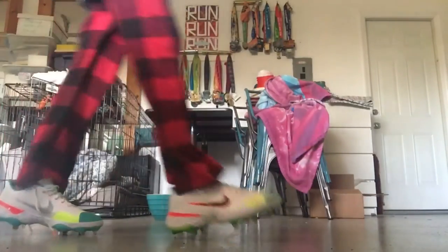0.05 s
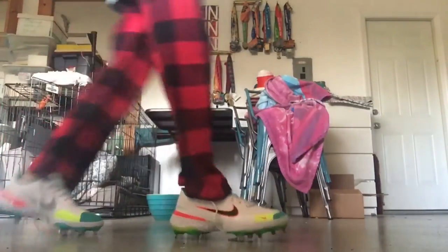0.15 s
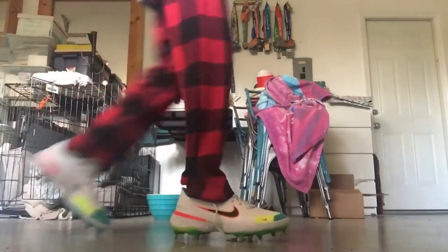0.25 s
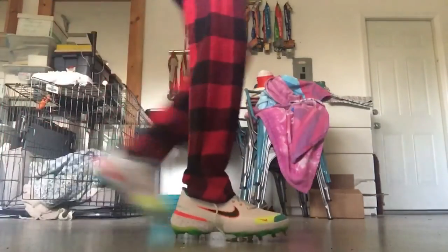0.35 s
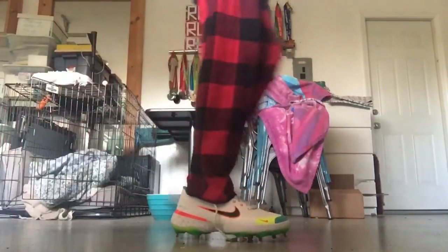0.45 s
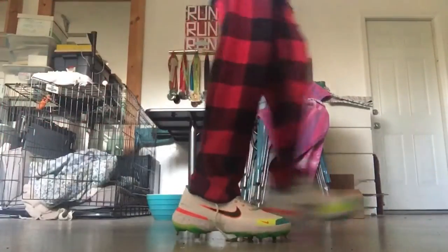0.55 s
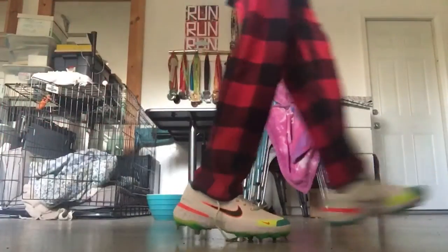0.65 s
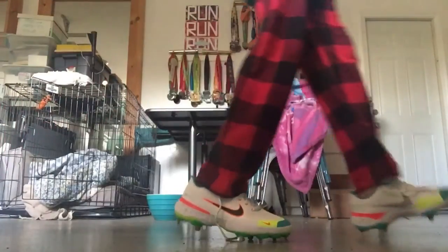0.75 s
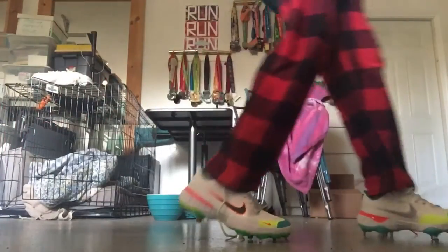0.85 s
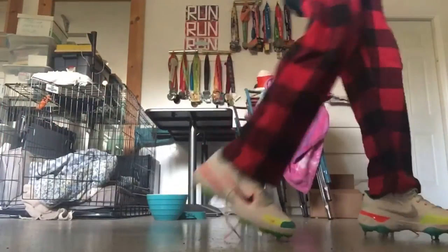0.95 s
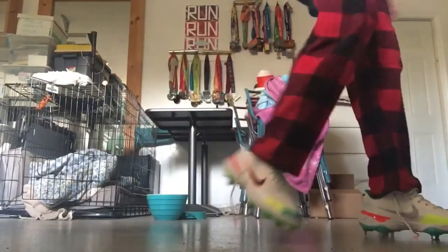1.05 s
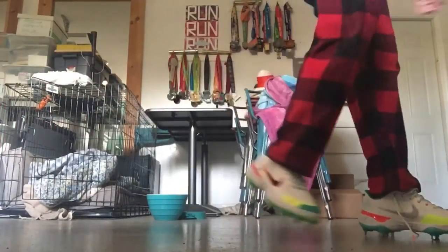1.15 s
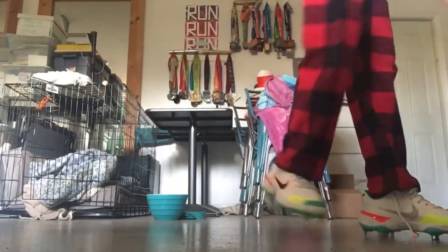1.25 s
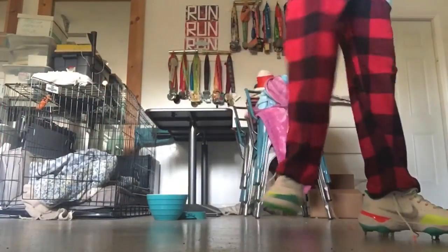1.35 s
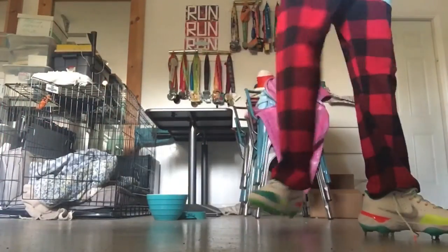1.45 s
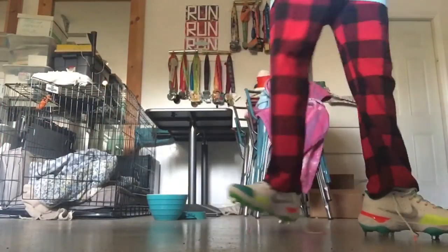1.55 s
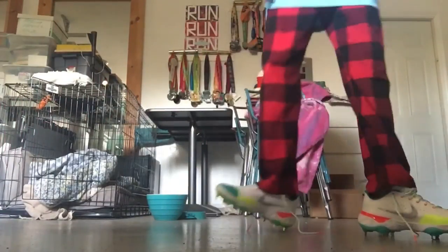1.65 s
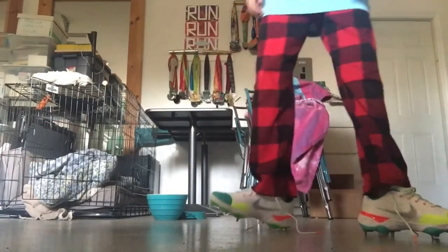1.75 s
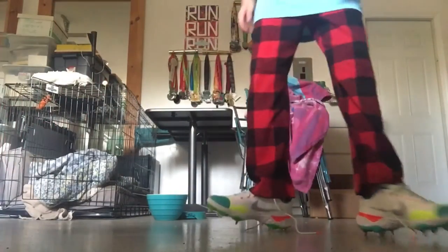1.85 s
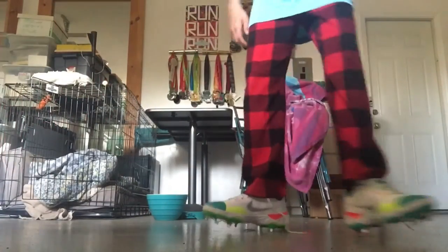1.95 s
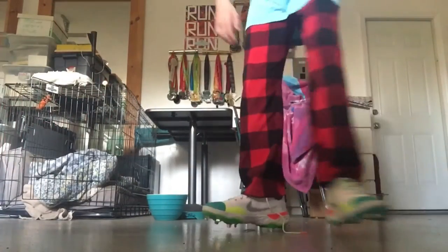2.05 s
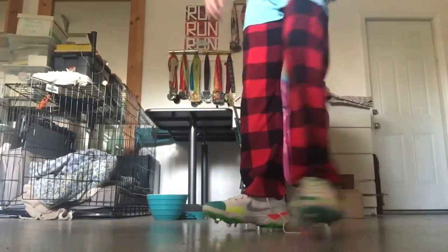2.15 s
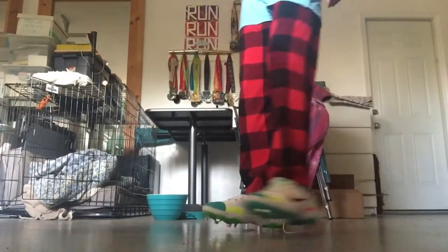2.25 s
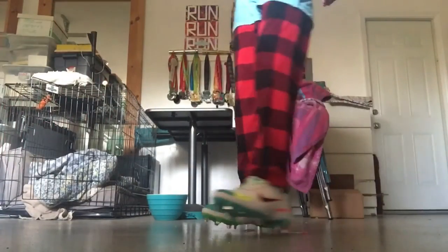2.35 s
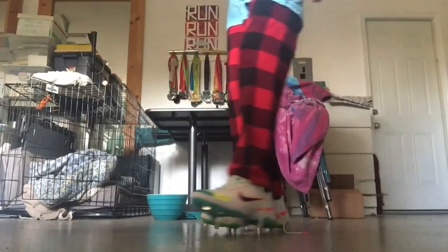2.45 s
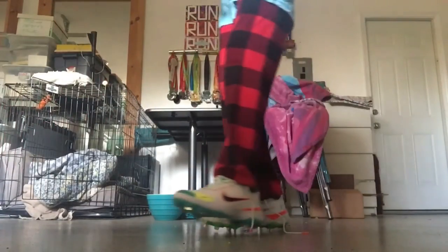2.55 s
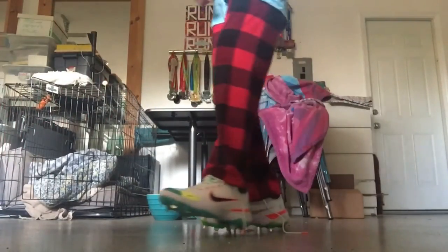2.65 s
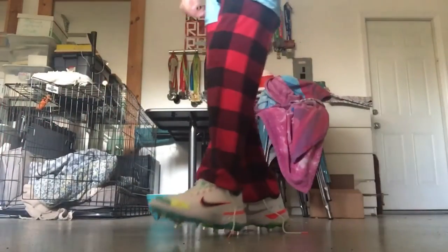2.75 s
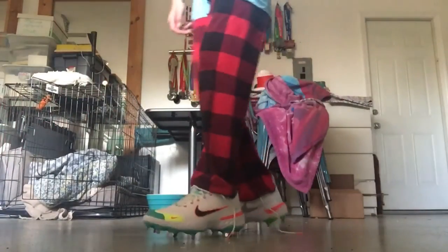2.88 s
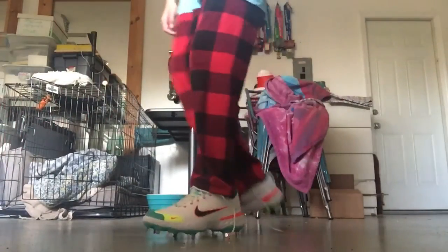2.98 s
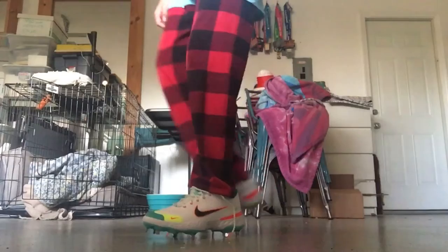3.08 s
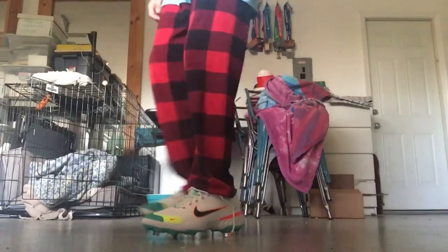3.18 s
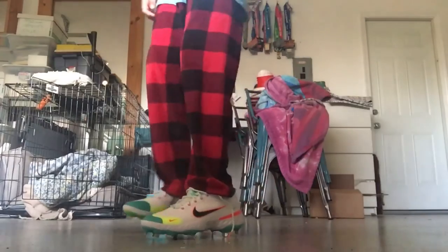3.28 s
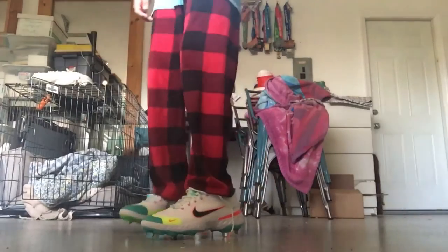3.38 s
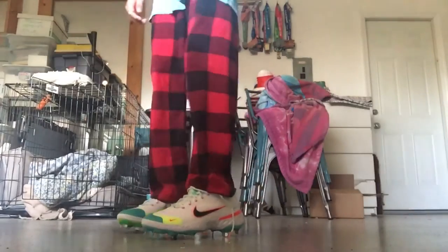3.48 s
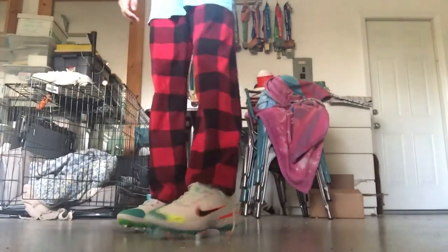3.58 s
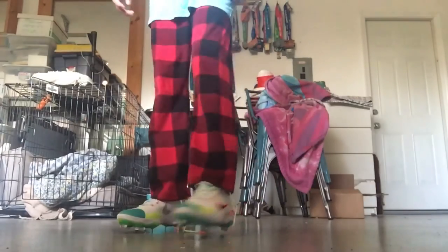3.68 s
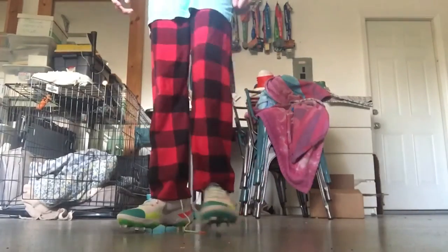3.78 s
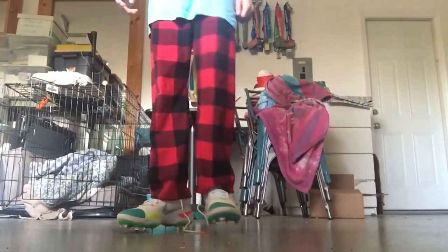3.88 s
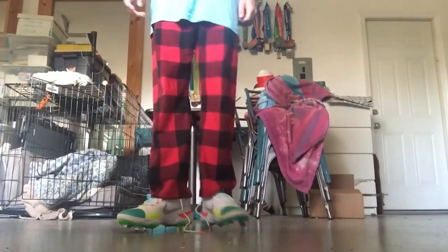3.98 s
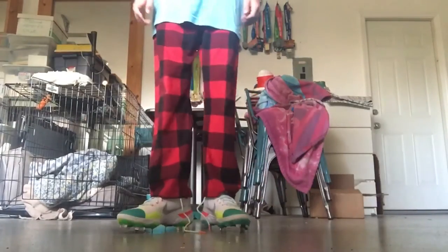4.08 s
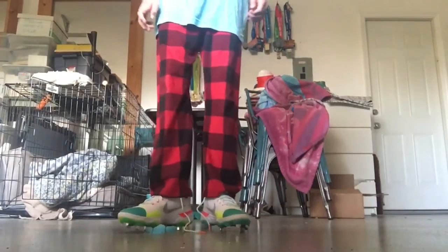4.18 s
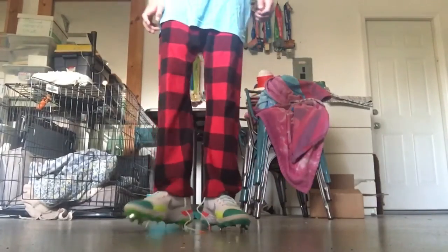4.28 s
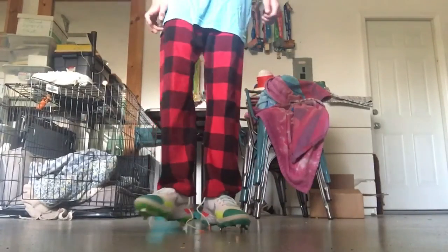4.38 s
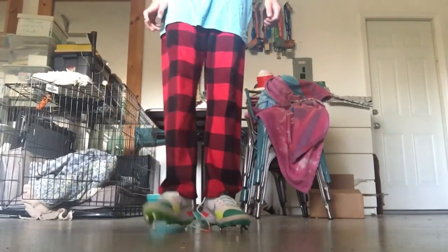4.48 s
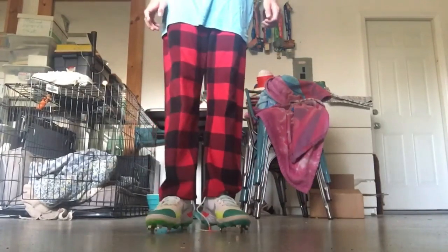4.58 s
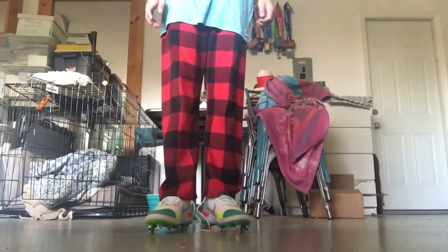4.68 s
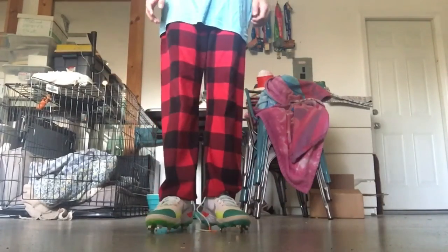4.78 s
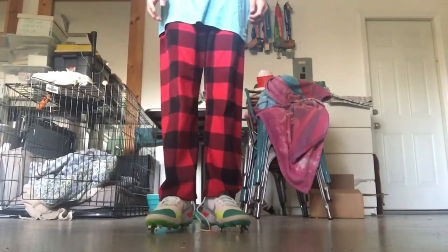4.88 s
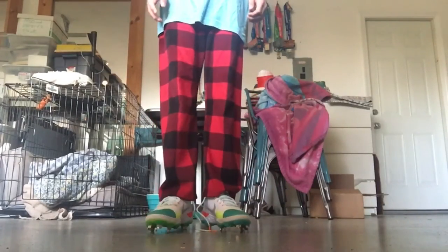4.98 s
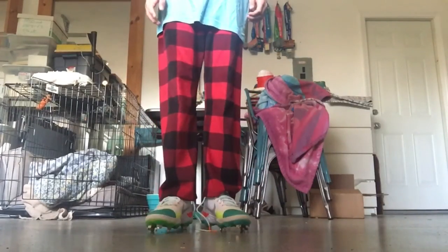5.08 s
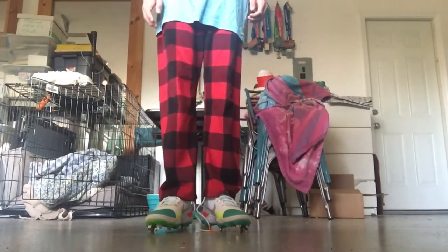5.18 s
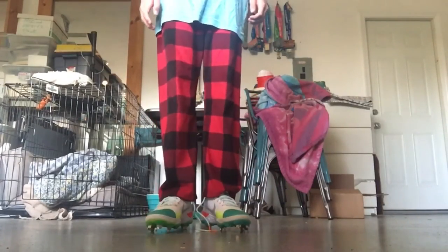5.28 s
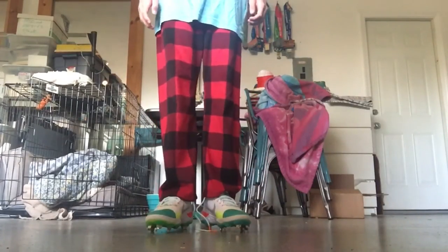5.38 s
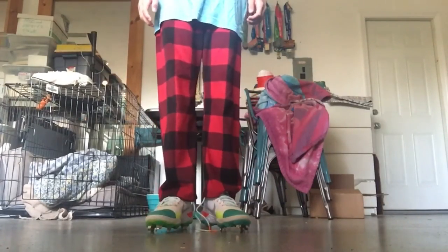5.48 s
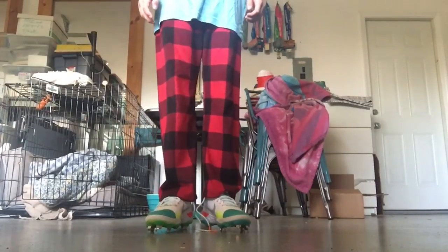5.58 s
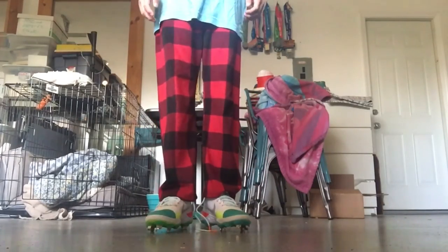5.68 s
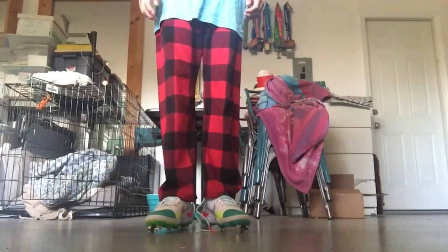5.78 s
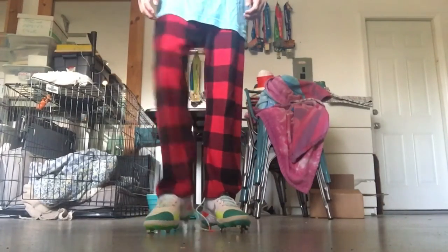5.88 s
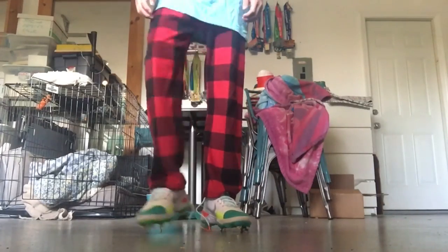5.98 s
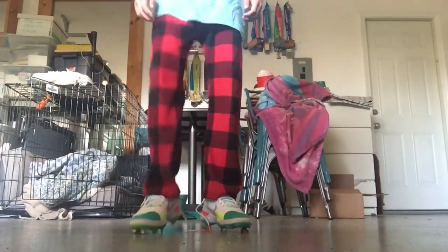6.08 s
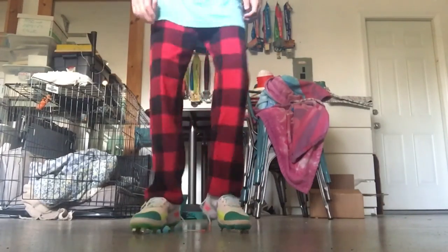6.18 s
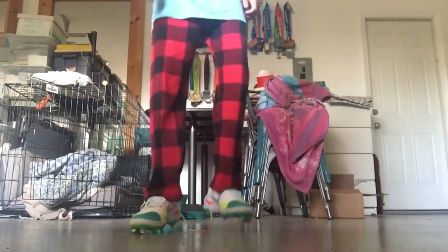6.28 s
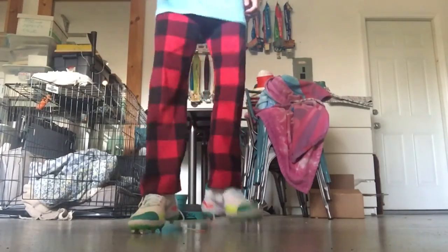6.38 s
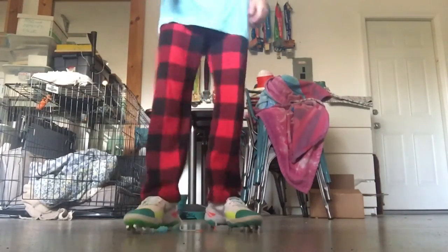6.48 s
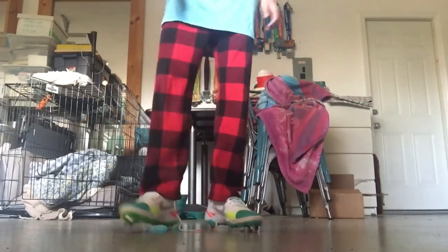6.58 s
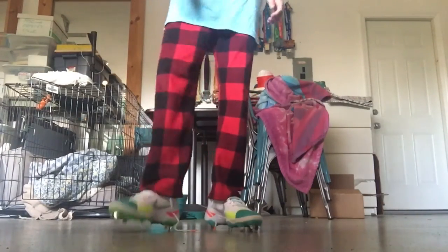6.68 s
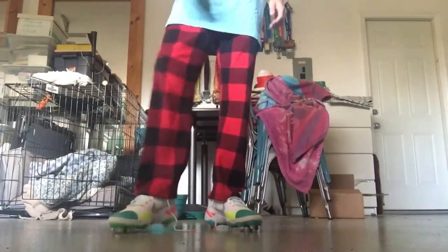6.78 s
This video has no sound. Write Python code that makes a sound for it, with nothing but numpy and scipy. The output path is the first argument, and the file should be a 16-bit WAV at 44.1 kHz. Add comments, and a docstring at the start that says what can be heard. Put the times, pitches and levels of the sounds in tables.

```python
"""Metal-spiked cleats walk, turn and stomp on the bare concrete floor of a garage, close to a low
microphone. Each step is a few separate spike contacts: the steel clacks, the stiff sole plate knocks
and the weight thumps in just behind. Spikes scuff lightly between steps, and the hard room rings for
about half a second. Trouser legs brush softly over a faint rumble, hiss, hum and whine."""
import sys
import numpy as np
from scipy import signal
from scipy.fft import rfft, irfft, next_fast_len
from scipy.io import wavfile
from scipy.ndimage import uniform_filter1d, map_coordinates

SR = 44100
rng = np.random.default_rng(int(sys.argv[2]) if len(sys.argv) > 2 else 0)


def persist_wave(psi):
    """Save psi, clipped to +-1, as 16-bit WAV."""
    counts = np.round(np.clip(psi, -1, 1) * 32767).astype(np.int16)
    wavfile.write(sys.argv[1], SR, np.atleast_2d(counts).T)


N = 301644

# Each time a spike meets the floor. Edge is positive on its sharp tip and negative when it lands flat.
# (time [s], force [dB], heel thump above the force [dB], edge [dB], sole plate pitch [Hz])
SPIKE_CONTACTS = [(.0405, -4.5, -2, -11, 1350), (.1461, -6, -10, -2.5, 2300), (.1504, -8, -10.5, 7, 1530),
                  (.1547, -34, -7, 23, 1650), (.2008, -17, 6, -6, 1900), (.5019, -36, -1, 24, 1650),
                  (.5612, -36, 14, 2, 1700), (.6113, -28, -8, -5, 1460), (.7482, -36, 9.5, -10, 1450),
                  (.7763, -4, -0.5, -5.5, 1400), (.842, -6, -7, 1, 1760), (.8638, -7.5, -11, 2.5, 1700),
                  (.8787, -10.5, 3.5, -2, 1660), (.8962, -16.5, 9, -8, 1660), (1.0272, -47, 0, 24.5, 1650),
                  (1.3195, -43, 1, -8, 1440), (1.6727, -8, 3, -16.5, 1550), (1.7974, -13, -3.5, -4.5, 1540),
                  (1.9827, -6, -6.5, 6.5, 2030), (2.4633, -6.5, 3.5, -2, 1830), (2.5967, -42, 0, 17, 1600),
                  (2.7338, -12, -0.5, -3, 1660), (2.8596, -14.5, -8, -6, 2260),
                  (2.8647, -6, -5.5, 1.5, 1770), (2.9498, -24, 4, -7, 1790), (3.3214, -33.5, -4, -12, 1550),
                  (3.4233, -7.5, -0.5, 2.5, 1690), (3.4361, -6, -1, -12, 1490),
                  (3.8885, -47.5, 0, 20, 1700), (3.9906, -4.5, -2.5, -3, 1570), (4.0084, -8, -4.5, 6, 1700),
                  (4.0431, -8, -5.5, 3, 1330), (4.4825, -6.5, -3.5, -6.5, 1440),
                  (4.5423, -8.5, -5, 4, 1530), (4.5495, 0.9, 2, 4.5, 1930), (5.8937, -15, -6, -7, 1801),
                  (6.0859, -2.3, -3.5, 9, 1450), (6.1026, -5.5, -5.5, -5, 2110),
                  (6.1775, -11.5, -2, 4, 1360), (6.4424, 1, 2, -3, 1840), (6.4537, -8.5, -5, 14.5, 1300),
                  (6.471, 2, -3, 5.5, 1380), (6.4774, 1.5, -9, 5, 2030), (6.4845, -5, -1, 5, 2400),
                  (6.7502, 2, -0.5, 7, 1590)]
# How knock, plate, clack, ring and grit share the force; a sharper edge favours the higher ones.
# (share [dB], change with edge [dB per dB])
FORCE_SHARES = [(-3, 0), (1.47, -.3), (-0.66, 0.36), (-9.5, 0.73), (-13.5, 1.2016)]
# The shoe's resonances, which die fast under a person's weight: (pitch [Hz], width [Hz])
HEEL_THUMP, SOLE_KNOCK = (269, 343), (712, 434)
SPIKE_RING, CONCRETE_GRIT = (4880, 3450), (3100, 13000)
PLATE_WIDTH_HZ, CLACK_WIDTH_HZ = 1860, 2540  # these two change pitch with each contact
SPIKE_HZ, SPIKE_HZ_PER_DB = 2970, 30  # the clack's pitch, which rises with the edge
# Spikes dragging lightly over the concrete: (start [s], length [s], level [dB])
SPIKE_DRAGS = [(0.498, 0.08, -58.5), (0.597, 0.16, -67), (1.659, 0.14, -67), (2.155, 0.093, -73),
               (2.546, .07, -63), (3.873, 0.043, -63)]
# The tone of that dragging: (frequency [Hz], level [dB])
DRAG_SPECTRUM = [(500, -25), (4300, 0), (5400, 8), (6800, 2), (13000, -1), (16000, -4)]
# Low notes that ring between the walls: (pitch [Hz], relative level [dB], time to fade 60 dB [s])
STANDING_WAVES = [(88, 1, .55), (119.1, 3.5, 0.55), (165.7, -4, 0.45), (197.3, -6.5, 0.56),
                  (290, -7.5, 0.52), (379.5, 2, 0.32), (478, -2, 0.65), (704, -18.5, 0.79)]
# First echoes off the walls: (delay [s], level [dB])
WALL_ECHOES = [(0.0116, -22.5), (0.02, -22.5), (0.026, -19.5), (0.062, -16)]
# How long the room rings: (frequency [Hz], time to fade 60 dB [s])
ROOM_FADE_TIMES = [(100, 0.36), (300, 0.61), (700, 0.55), (1800, 0.59), (4800, 0.58), (9000, .46),
                   (15000, 0.4)]
# The tone of the room's ringing: (frequency [Hz], gain [dB])
ROOM_SPECTRUM = [(45, 9.5), (90, 14.5), (150, 7), (220, 2), (370, 3), (600, -0.5), (1300, 5.5), (2000, 2.5),
                 (3000, -0.5), (6000, -1.5), (9000, 3), (14000, -5.5)]
# Trouser legs brushing through strides, small steps, standing still and stomps: (time [s], level [dB])
CLOTH_LEVELS = [(0, -59.5), (.4, -75), (.62, -67), (1.1, -72.5), (3.7, -73), (4.6, -85), (5.7, -96),
                (6.0, -72.5)]
# The rumble of the still garage: (frequency [Hz], relative level [dB])
RUMBLE_SPECTRUM = [(15, -68), (25, -40.5), (54, -7.5), (101, -3), (162, -11.5), (195, -8.5), (348, -15),
                   (407, -23.5), (441, -20), (637, -23), (689, -21.5), (971, -24), (13500, -41.5)]


def steps(tail_db=-5.5, spot_count=7):
    """Every contact, heard directly and through the room, which answers differently from each spot."""
    track = np.zeros(N)
    spots = [(garage_echoes(waves_db=-58.5), room_tail()) for _ in range(spot_count)]
    for k, (start_s, force_db, weight_db, edge_db, plate_hz) in enumerate(SPIKE_CONTACTS):
        direct, spread = spike_contact(force_db + weight_db, shoe_spectrum(force_db, edge_db, plate_hz))
        echoes, tail = spots[k % spot_count]
        add(track, start_s, direct)
        add(track, start_s, signal.fftconvolve(direct, echoes))
        add(track, start_s, amp(tail_db) * signal.fftconvolve(spread, tail))
    return track


def shoe_spectrum(force_db, edge_db, plate_hz):
    """Frequencies and their power for one landing: knock, plate, clack, ring and grit added up."""
    hz = np.fft.rfftfreq(2048, 1 / SR)
    plate = (plate_hz, PLATE_WIDTH_HZ)
    clack = (SPIKE_HZ + SPIKE_HZ_PER_DB * edge_db, CLACK_WIDTH_HZ)
    parts = [SOLE_KNOCK, plate, clack, SPIKE_RING, CONCRETE_GRIT]
    levels_db = [force_db + share_db + slope * edge_db for share_db, slope in FORCE_SHARES]
    return hz, sum(amp(db) ** 2 * resonance(hz, *part) for part, db in zip(parts, levels_db))


def spike_contact(thump_db, spectrum, ripple_db=2.0, ripple_hz=330, room_ripple_db=0.93, travel_s=.0005):
    """A spike lands: the click aimed at the microphone, and the smoother pulse spread into the room."""
    hz, power = spectrum
    # each spike and foot angle favours different small resonances of the sole
    ripple = map_coordinates(rng.standard_normal(len(hz)), [hz / ripple_hz])
    clack = impulse(power * amp(ripple_db * ripple) ** 2)
    force = strike_force()
    # low bending waves cross the sole more slowly (travel_s is the time at 1 kHz)
    bending = np.exp(-4j * np.pi * travel_s * np.sqrt(1000 * hz))
    struck = irfft(rfft(clack) * rfft(force, len(clack)) * bending)
    struck *= np.linalg.norm(clack) / np.linalg.norm(struck)  # keep the clack's energy
    direct = struck + amp(thump_db) * heel_thump(len(clack))
    thump_power = amp(thump_db) ** 2 * resonance(hz, *HEEL_THUMP)
    spread = impulse(thump_power + power * amp(room_ripple_db * ripple) ** 2)
    return direct, spread


def strike_force(second_s=0.00066, second_share=0.48, crunch=0.061, crunch_s=0.00084):
    """One spike hits, a neighbour hits just after it, and concrete grains crunch in a short swell."""
    t = np.arange(SR // 200) / SR
    force = crunch * rng.standard_normal(len(t)) * t / crunch_s * np.exp(1 - t / crunch_s)
    force[0] += 1
    second_hit = round(second_s * rng.uniform(.6, 1.4) * SR)
    force[second_hit] += second_share * rng.uniform(0.24, 1)
    return force


def heel_thump(size, pitch_hz=310, lag_s=0.00335, length_s=0.0023, gain_db=2):
    """The weight lands just after the steel: one dull swing of the heel."""
    t = np.arange(size) / SR - lag_s
    hz = pitch_hz * rng.uniform(0.74, 1.224)
    swing = np.sin(2 * np.pi * hz * t) * np.exp(-(t / length_s) ** 2)
    return amp(gain_db) * swing / np.linalg.norm(swing)


def scuffs(grain_db=4, room_db=-7):
    """Dragged spikes catch on countless tiny grains, and the room rings after them."""
    track = np.zeros(N)
    for start_s, length_s, db in SPIKE_DRAGS:
        size = round(length_s * SR)
        catches = amp(grain_db * wobble(size, smooth_samples=90))
        scrape = unit(noise(DRAG_SPECTRUM, size) * catches)
        add(track, start_s, amp(db) * scrape * signal.windows.tukey(size, .5))
    return track + amp(room_db) * signal.fftconvolve(track, room_tail())[:N]


def garage_echoes(waves_db):
    """The room's clear answers to a click: low ringing notes and the first echoes off the walls."""
    t = np.arange(SR) / SR
    answer = np.zeros(SR)
    for hz, db, fade_s in STANDING_WAVES:
        answer += amp(waves_db + db - 60 * t / fade_s) * np.sin(2 * np.pi * (hz * t + rng.random()))
    dull_click = np.hanning(9) / 4  # cluttered walls dull each echo
    for delay_s, db in WALL_ECHOES:
        add(answer, delay_s * (1 + .03 * rng.standard_normal()), amp(db) * dull_click)
    return answer


def room_tail(build_s=0.0052):
    """Countless echoes blur into fading noise; the highest treble and the deep bass die first."""
    hz, times, slices = signal.stft(rng.standard_normal(SR), SR, nperseg=256)
    fade = amp(-60 * times / along(ROOM_FADE_TIMES, hz)[:, None])
    tail = signal.istft(slices * fade, SR, nperseg=256)[1][:SR]
    tail *= 1 - np.exp(-np.arange(SR) / SR / build_s)
    return filtered(tail / np.linalg.norm(tail), lambda f: amp(along(ROOM_SPECTRUM, f)))


def trousers():
    """Cloth brushes softly while the legs swing."""
    level_db = np.interp(np.arange(N) / SR, *np.transpose(CLOTH_LEVELS))
    return amp(level_db) * noise([(1500, -15), (5000, -2.5), (9000, -1.5), (15000, -1.5)], N)


def background(rumble_db=-61, hiss_db=-81, hum_db=-78, whine_db=-85, whine_hz=14150, waver_hz=25):
    """Low room rumble, microphone hiss, a faint hum and a thin, wavering high whine."""
    hum = np.sqrt(2) * np.sin(2 * np.pi * 97 * np.arange(N) / SR)
    waver = waver_hz * wobble(N, smooth_samples=400)
    whine = np.sqrt(2) * np.sin(2 * np.pi * np.cumsum(whine_hz + waver) / SR)
    hiss = noise([(6000, -16.5), (13000, -7.0), (16000, -14.5)], N)
    rumble = noise(RUMBLE_SPECTRUM, N)
    return amp(rumble_db) * rumble + amp(hiss_db) * hiss + amp(hum_db) * hum + amp(whine_db) * whine


def resonance(hz, centre, width):
    """A steep-sided hill of power around one pitch, with a total energy of 1."""
    power = (1 + ((hz ** 2 - centre ** 2) / ((hz + 1) * width)) ** 2) ** -3
    return power / np.mean(power)


def impulse(power):
    """The shortest click that starts at time zero and has this power at each frequency."""
    cepstrum = irfft(np.log(power + 1e-9 * power.max()) / 2)
    half = len(cepstrum) // 2
    # folding the second half onto the first moves the energy to the start of the click
    cepstrum[1:half] *= 2
    cepstrum[half + 1:] = 0
    return irfft(np.exp(rfft(cepstrum)))


def noise(spectrum, size):
    """Noise of strength 1, with its tone set by (frequency [Hz], level [dB]) points."""
    return unit(filtered(rng.standard_normal(size), lambda hz: amp(along(spectrum, hz))))


def wobble(size, smooth_samples):
    """A random wander of strength 1; more smoothing makes it slower."""
    return unit(uniform_filter1d(rng.standard_normal(size), smooth_samples))


def filtered(x, response):
    """Turn each frequency in x up or down by the gain response(hz)."""
    size = next_fast_len(len(x) + 8192)
    return irfft(rfft(x, size) * response(np.fft.rfftfreq(size, 1 / SR)), size)[:len(x)]


def along(points, hz):
    """Read between (frequency [Hz], value) points, with every octave equally wide."""
    frequencies, values = np.transpose(points)
    return np.interp(np.log(hz + 1), np.log(frequencies), values)


def amp(db):
    """Turn decibels into a gain to multiply by."""
    return 10 ** (np.asarray(db) / 20)


def unit(x):
    """Scale x to an average strength (rms) of 1."""
    return x / np.sqrt(np.mean(x ** 2) + 1e-30)


def add(track, start_s, x):
    """Mix x into the track at the given time."""
    i = max(round(start_s * SR), 0)
    track[i:i + len(x)] += x[:max(len(track) - i, 0)]


def scene():
    """Steps, scuffs and cloth over the quiet garage, in one channel."""
    return (steps() + scuffs() + trousers() + background())[None]


def record(dry, top_hz=16000):
    """Cut away the very highest treble, above top_hz."""
    return np.array([filtered(x, lambda hz: 1 / np.sqrt(1 + (hz / top_hz) ** 200)) for x in dry])


dry = scene()
out = record(dry)
persist_wave(out)
```